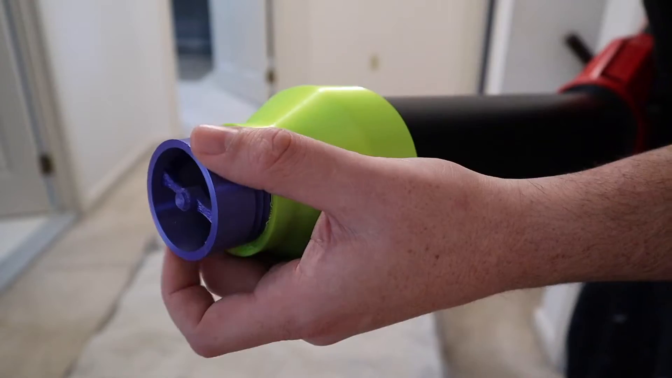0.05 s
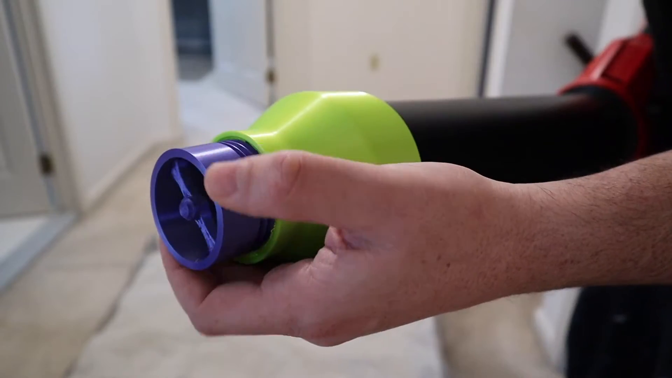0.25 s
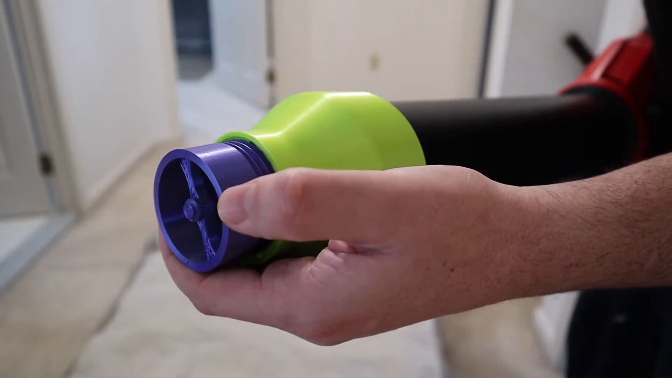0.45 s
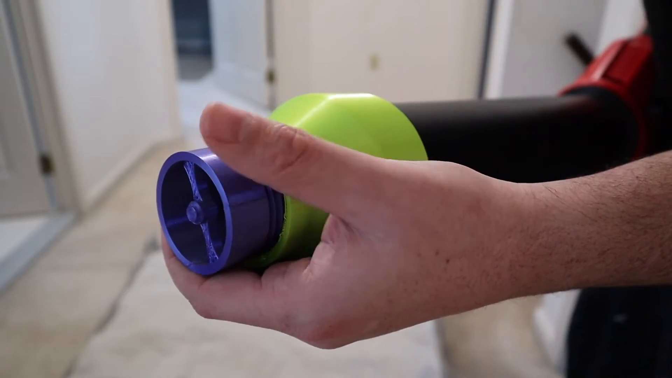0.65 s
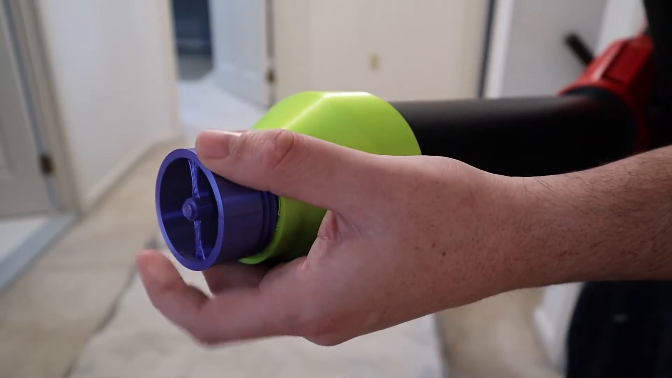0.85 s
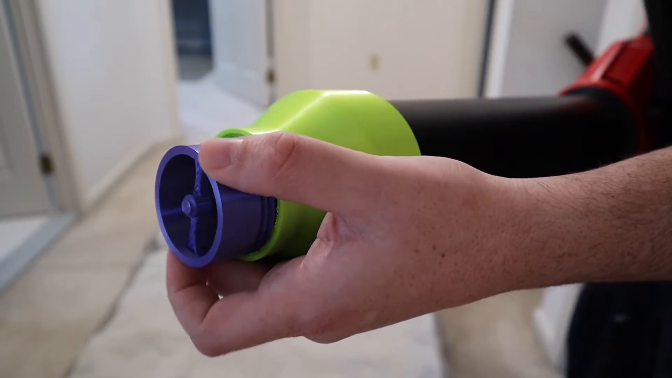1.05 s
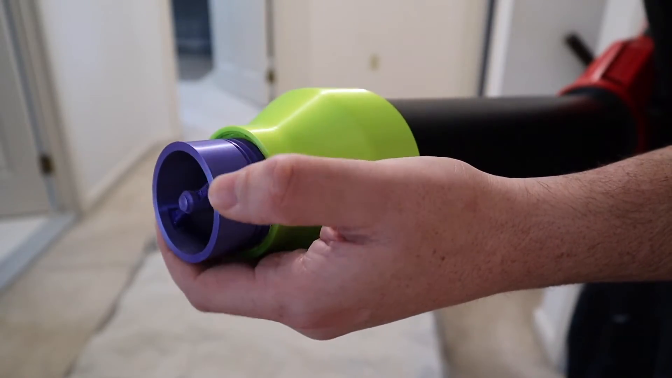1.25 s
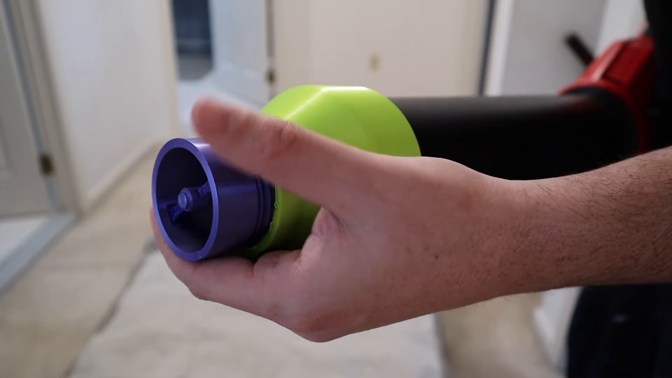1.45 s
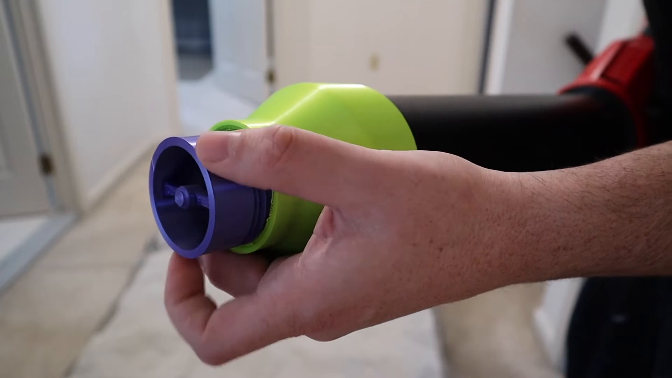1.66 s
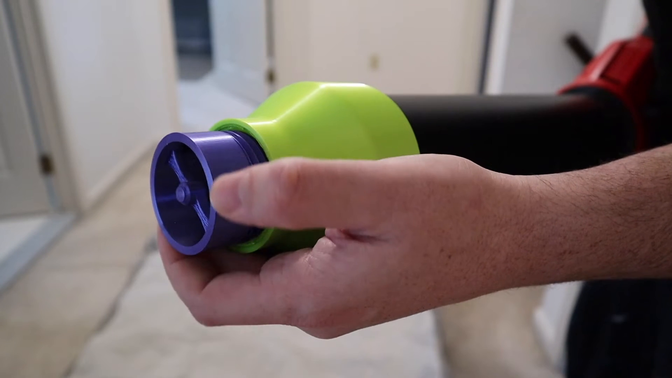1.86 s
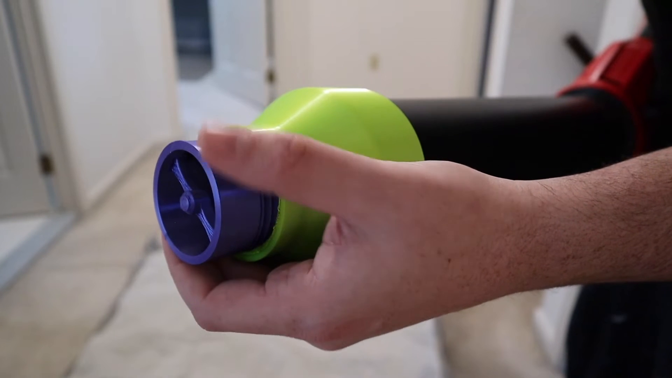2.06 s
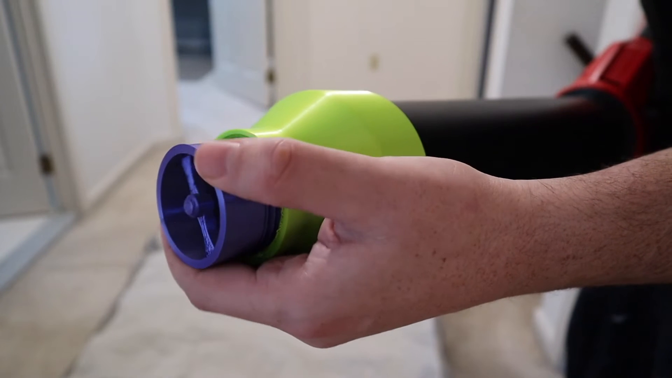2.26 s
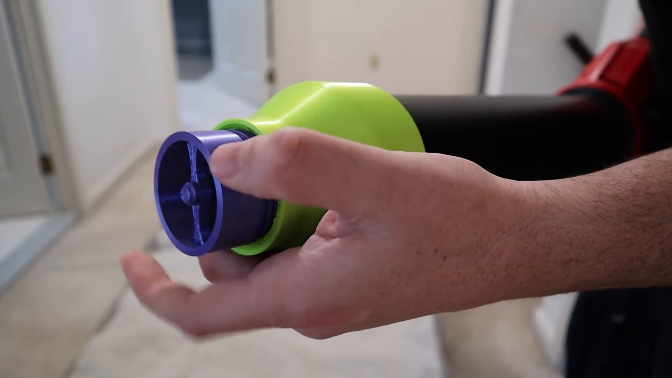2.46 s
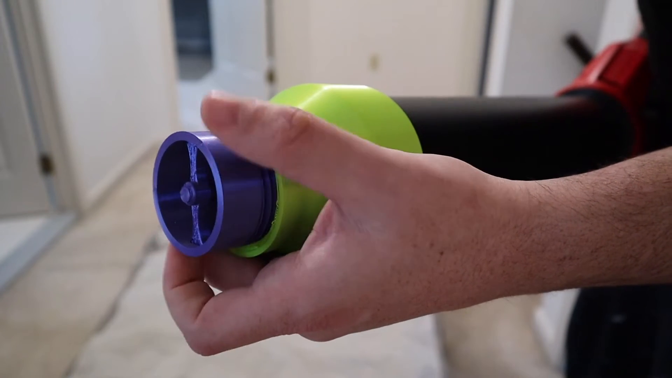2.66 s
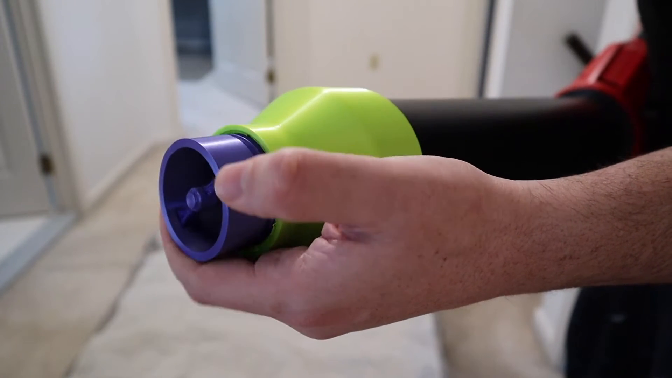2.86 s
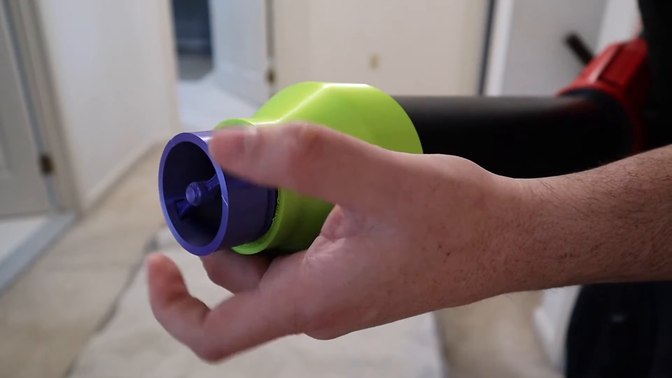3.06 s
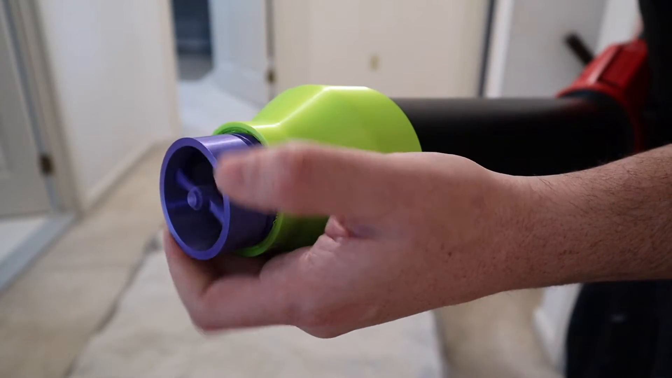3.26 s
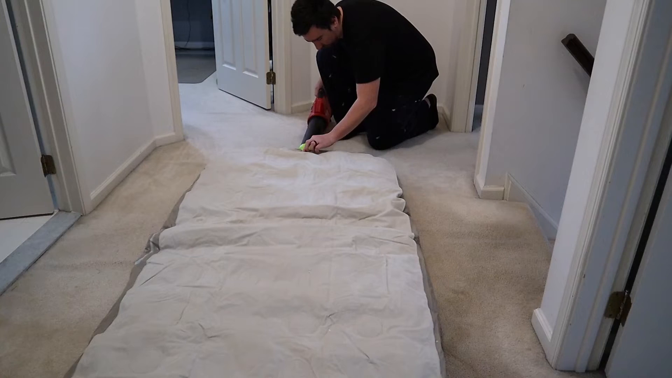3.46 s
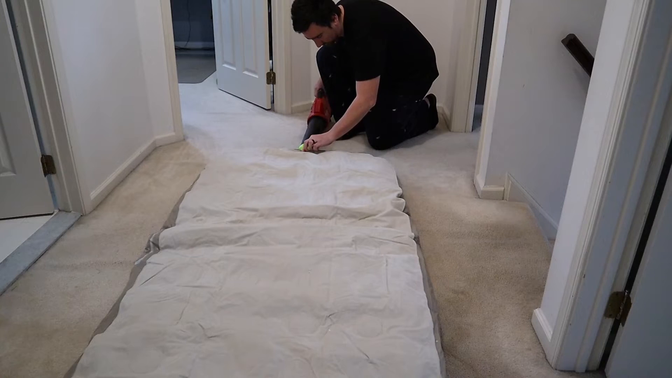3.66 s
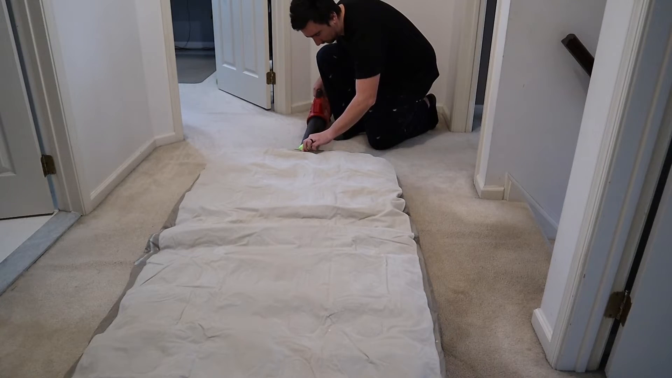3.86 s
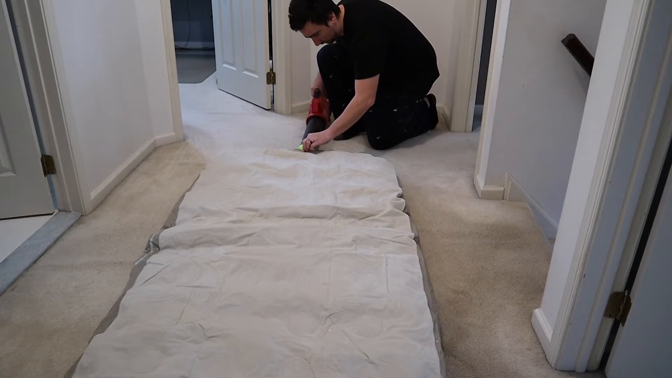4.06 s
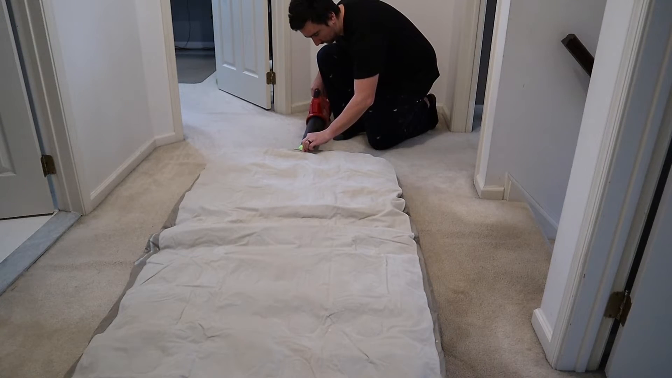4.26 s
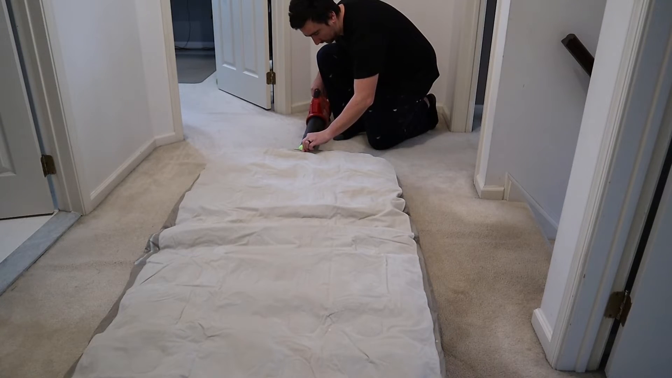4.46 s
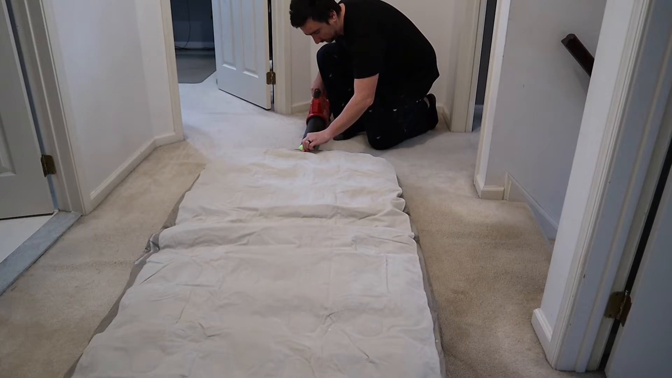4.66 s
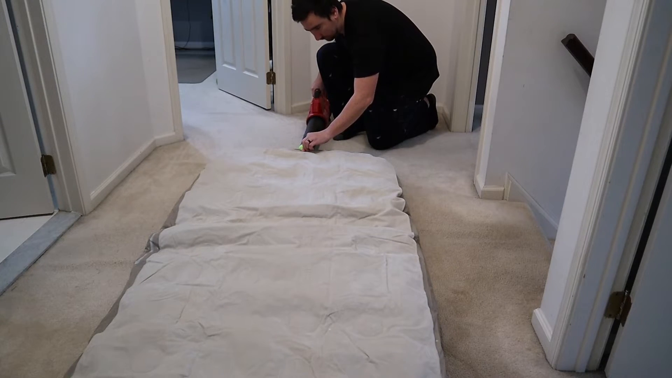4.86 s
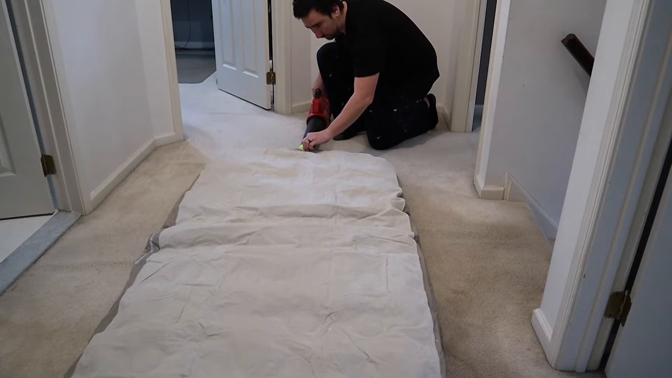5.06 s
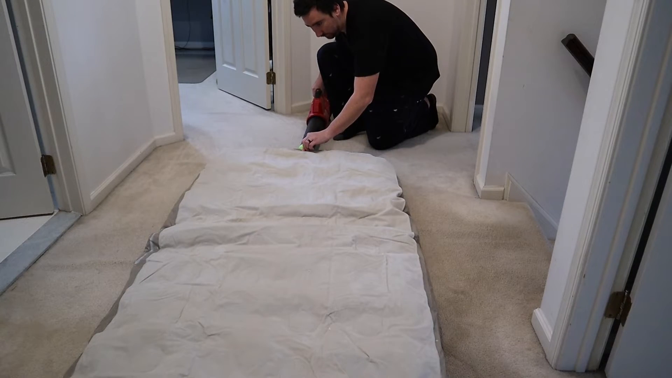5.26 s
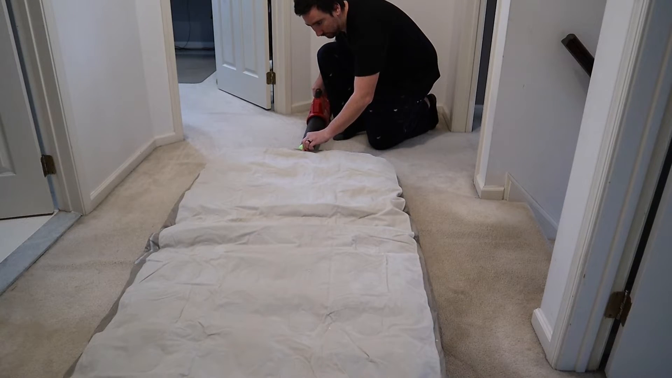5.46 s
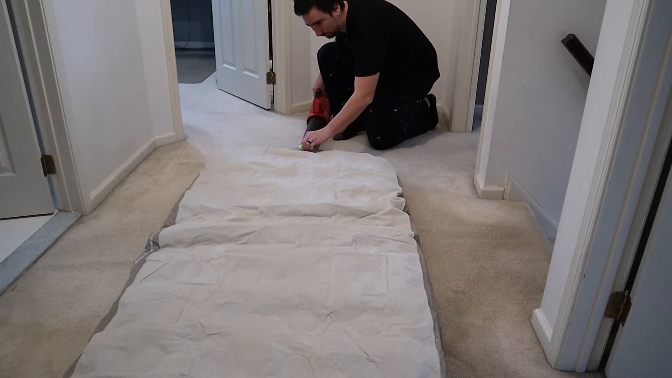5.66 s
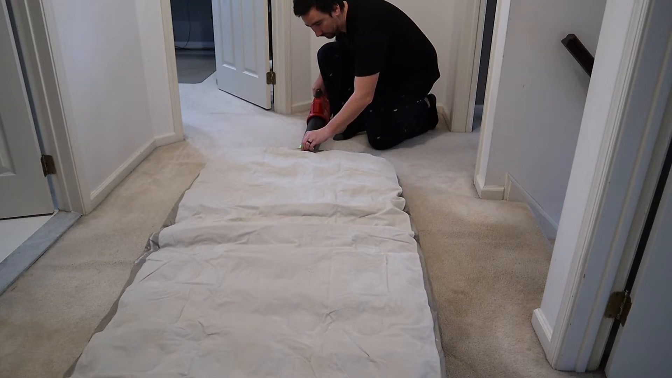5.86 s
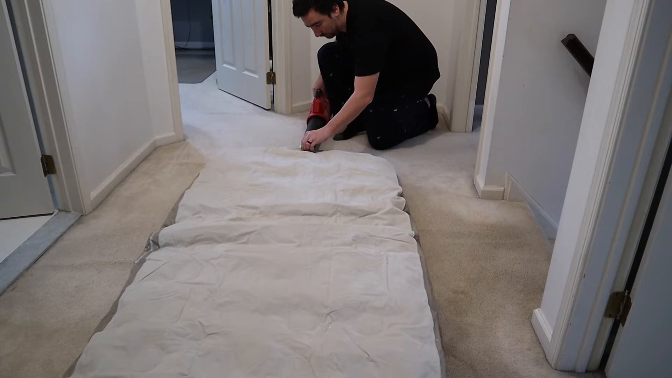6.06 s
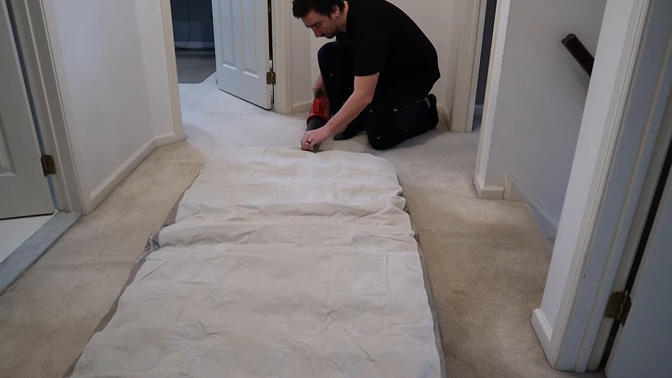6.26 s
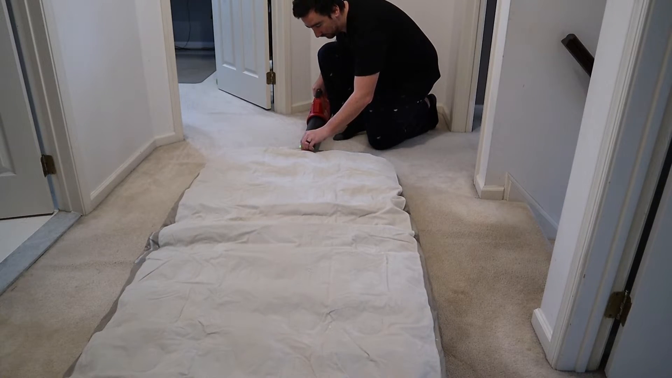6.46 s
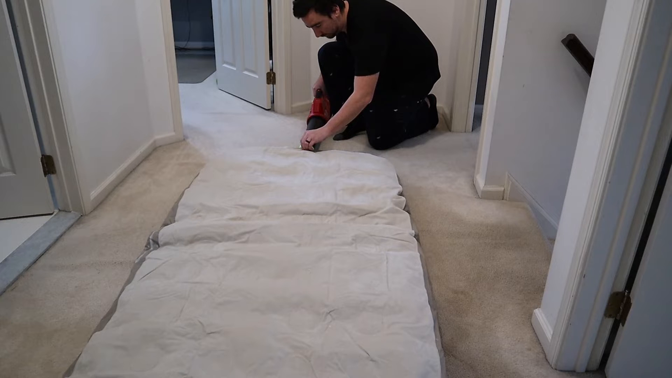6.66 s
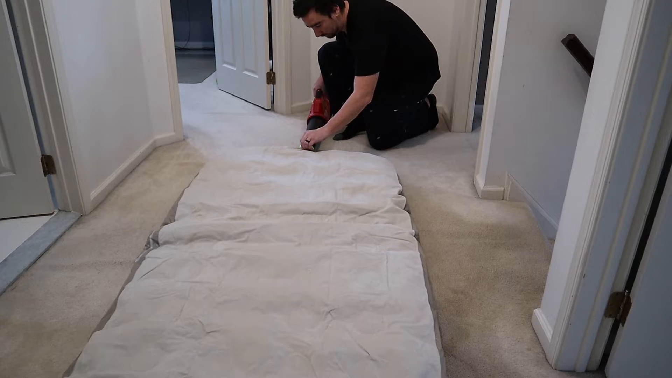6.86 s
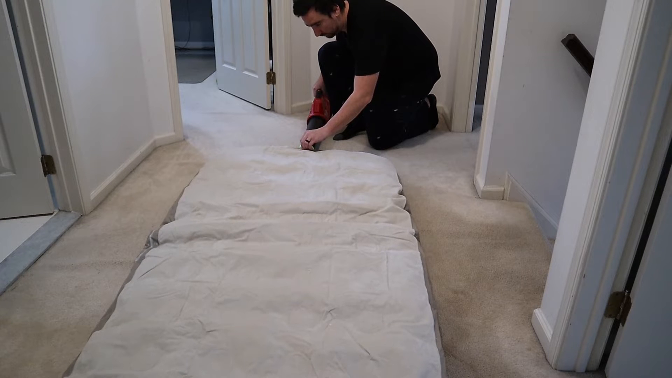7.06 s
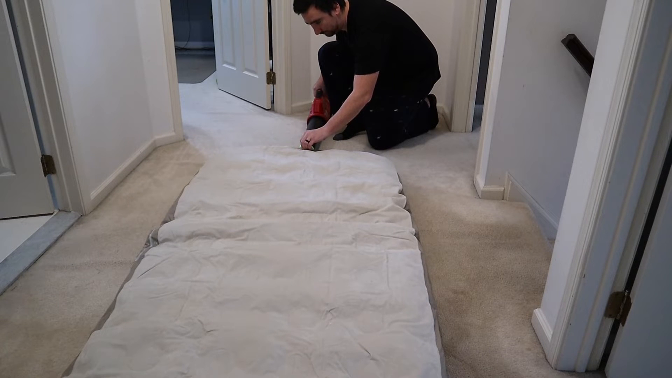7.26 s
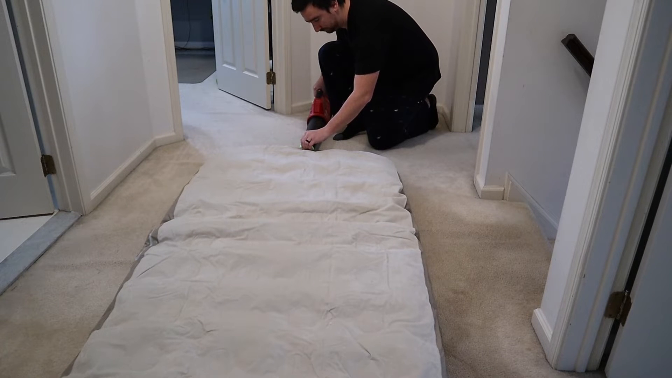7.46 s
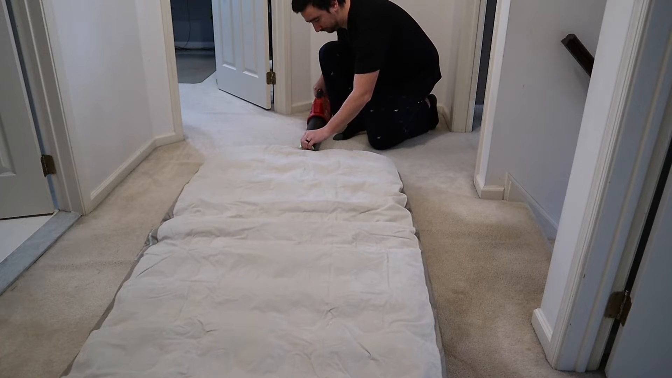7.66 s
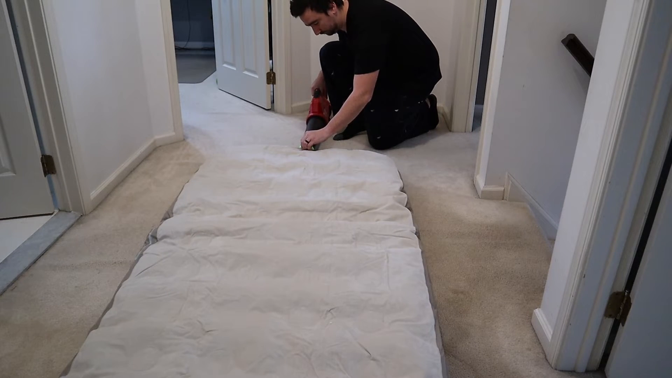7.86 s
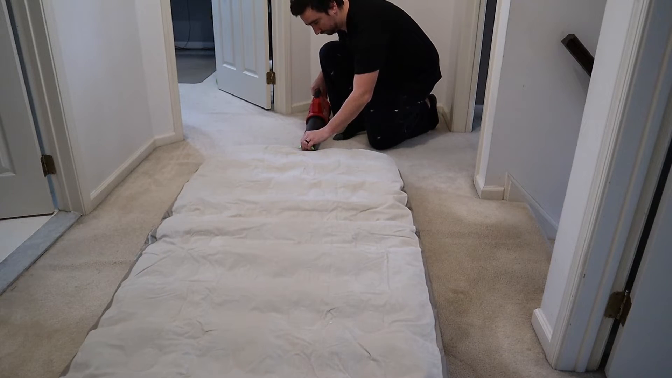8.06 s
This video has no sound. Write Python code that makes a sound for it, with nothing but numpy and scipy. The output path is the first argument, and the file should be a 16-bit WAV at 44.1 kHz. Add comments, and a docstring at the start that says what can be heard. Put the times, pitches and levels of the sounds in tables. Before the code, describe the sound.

For the first 3.4 seconds, a plastic adapter is twisted into a leaf blower's nozzle, close by in a carpeted hallway with little echo. Quiet, grainy rubbing swells and fades with each twist, while dry clicks come in uneven clusters as the thread catches and slips, busiest between 2.2 and 3.3 seconds. Soft hollow bumps sound on the tube. A short pause holds only faint room tone. At about 4.1 seconds the blower starts with a brief buzz and a fast rising whine, reaching full speed within half a second. Much louder than the handling, it pushes air into an air mattress: a hollow, resonant rush with a high, slightly wavering whistle on top. The first gust eases a little and holds steady. At about 6.6 seconds the sound abruptly jumps much higher and thinner, sped up, and continues until the end at around 8 seconds.

```python
"""Plastic rubs and clicks close by, in a carpeted hallway: a valve adapter is twisted into the nozzle
of a leaf blower, catching and slipping, while the hand bumps the hollow tube. Then the blower spins up
and forces air down the tube into an air mattress: a rush full of tube resonances with a twelve-blade
whistle on top. The last stretch plays three times too fast, as a time lapse."""
import sys
import numpy as np
from scipy import signal
from scipy.fft import rfft, irfft, next_fast_len
from scipy.io import wavfile
from scipy.ndimage import uniform_filter1d

SR = 44100
rng = np.random.default_rng(int(sys.argv[2]) if len(sys.argv) > 2 else 0)


def inscribe(sig):
    """Save sig as 16-bit PCM at rate SR to the path in sys.argv[1].

    A 1-D sig is mono; a 2-D sig holds one channel per row.
    Samples are clipped to [-1, 1] before scaling.
    """
    pcm = np.round(np.clip(np.atleast_2d(sig).T, -1, 1) * 32767)
    wavfile.write(sys.argv[1], SR, pcm.astype(np.int16))


N = 357651


def undb(db):
    """Decibels to gain."""
    return 10 ** (np.asarray(db) / 20)


def unit(x):
    """Scale to rms 1."""
    return x / np.sqrt(np.mean(x ** 2))


def bell(x, centre, width):
    """A smooth hump of height 1; width spans two standard deviations."""
    return np.exp(-.5 * (2 * (x - centre) / width) ** 2)


def curve_db(rows, hz):
    """Read an EQ curve at the given frequencies."""
    f, db = np.transpose(rows)
    return np.interp(np.log(hz + 1), np.log(f), db)


def colour(x, db_at):
    """EQ by a function from Hz to dB, then scale to rms 1."""
    size = next_fast_len(len(x))
    gain = undb(db_at(np.arange(size // 2 + 1) * SR / size))
    return unit(irfft(rfft(x, size) * gain, size)[:len(x)])


def tilt(x, db_per_octave):
    """Brighten or dull between 600 and 7500 Hz; rms 1."""
    return colour(x, lambda hz: db_per_octave * np.log2(np.clip(hz, 600, 7500) / 2600))


def wander(rate_hz, size):
    """Smooth random modulation with a spread near 1."""
    hold = int(SR / rate_hz)
    steps = np.repeat(rng.standard_normal(size // hold + 1), hold)
    return 1.21 * uniform_filter1d(steps, hold)[:size]


# EQ of the room tone: (frequency [Hz], level [dB])
ROOM_TONE_EQ = [(15, -36), (25, -16), (116, -10), (246, -14), (433, -17), (509, -14), (552, -16),
                (970, -19), (1410, -20.5), (1710, -23), (15500, -31)]

def room_tone(t, level_db=-63):
    """Low rumble of the house under a faint even hiss."""
    return undb(level_db) * colour(rng.standard_normal(len(t)), lambda hz: curve_db(ROOM_TONE_EQ, hz))


# reverb bands of the hallway: (centre [Hz], t60 [s], level [dB])
REVERB_BANDS = [(174, 0.65, -5.5), (400, 0.19, -0.5), (915, 0.27, -3.5), (2390, .22, -13),
                (7460, 0.18, -15), (15000, .13, -27)]

def hallway(x, build_s=0.0033):
    """Add diffuse reflections; carpet and walls swallow the treble first."""
    t = np.arange(SR // 2) / SR
    centres, tail = np.log([row[0] for row in REVERB_BANDS]), 0
    log_hz = np.log(1 + np.arange(len(t) // 2 + 1) * SR / len(t))
    for (hz, t60, db), share in zip(REVERB_BANDS, np.eye(len(REVERB_BANDS))):
        envelope = np.exp(-np.log(1000) * t / t60) * (1 - np.exp(-t / build_s))
        decay = unit(rng.standard_normal(len(t)) * envelope)
        crossover = np.sqrt(np.interp(log_hz, centres, share))
        tail = tail + undb(db) * irfft(rfft(decay) * crossover, len(t))
    return x + signal.fftconvolve(x, tail / np.sqrt(len(t)))[:N]


# twists of the hand: (time of firmest grip [s], level [dB], swell [s], fade [s])
TWISTS = [(0.0, -58, .05, 0.076), (.26, -53.5, 0.075, .07), (.81, -48, .016, .05),
          (1.14, -46.5, 0.078, 0.057), (1.62, -45, 0.041, 0.048), (1.825, -43.5, 0.048, 0.028),
          (2.27, -45.5, 0.04, 0.036), (2.44, -46.5, 0.073, 0.038), (2.8, -48, 0.13, .135),
          (3.256, -38, 0.029, .045)]

def grip():
    """Envelope of the rubbing: every twist swells and fades."""
    t = np.arange(N) / SR
    return np.max([undb(db) * np.exp(-np.maximum((s - t) / swell, (t - s) / fade))
                   for s, db, swell, fade in TWISTS], axis=0)


# EQ of the friction: (frequency [Hz], level [dB])
RUB_EQ = [(100, -32), (350, 7.5), (900, 3.5), (2000, -4.5), (4500, -8.5), (6500, -20), (8200, -9.5),
          (10500, -25), (13000, -15), (16000, -34)]

def rubbing(grain_db=4.0):
    """Dense tiny slips of skin and thread make a grainy scrape."""
    grains = rng.standard_normal(N) * undb(grain_db * wander(350, N))
    return colour(grains, lambda hz: curve_db(RUB_EQ, hz)) * grip()


# modes of the hollow adapter and nozzle: (frequency [Hz], level [dB], t60 [s])
NOZZLE_MODES = [(178.4, -18.5, 0.27), (289, -11.5, 0.054), (384, -8.5, 0.056), (446, -6.5, 0.043),
                (570, -4, 0.025), (732, -3, 0.036), (910, -1, 0.029), (1080, -0.5, 0.012), (1450, 2, 0.013),
                (1870, 2, 0.011), (2304, 2, 0.025), (2570, 1.5, 0.0074), (3840, 3, 0.0064),
                (4530, 1, 0.0043), (7550, 1, 0.0043), (8140, 0.5, 0.0069), (13600, -21, 0.012)]

def nozzle(push, ring_hz, crack_db=-6, ring_db=-11, favour_db=7, favour_octaves=0.18):
    """A dry crack plus a short plastic ring; the point of contact favours modes near ring_hz."""
    t = np.arange(SR // 4) / SR
    hz, db, t60 = np.transpose(NOZZLE_MODES)[:, :, None]
    db = db + favour_db * np.exp(-.5 * (np.log2(hz / ring_hz) / favour_octaves) ** 2)
    hz = hz * (1 + .015 * rng.standard_normal(hz.shape))  # the grip detunes the modes
    modes = np.sin(2 * np.pi * hz * t) * np.exp(-np.log(1000) * t / t60)
    modes = modes / np.sqrt(np.sum(modes ** 2, axis=1, keepdims=True))
    polarity = (-1) ** np.arange(len(NOZZLE_MODES))
    response = polarity @ (undb(ring_db + db) * modes)
    response[0] += undb(crack_db)
    return signal.fftconvolve(push, response)


def thread_ticks(firm_grip_db=-49, top_per_s=60, level_db=-32, spread_db=4):
    """Faint bright catches of the thread, more frequent the firmer the grip."""
    per_s = top_per_s * np.clip(grip() / undb(firm_grip_db), 0, 1)
    pushes = (rng.random(N) < per_s / SR) * undb(level_db + spread_db * rng.standard_normal(N))
    bright = tilt(pushes, db_per_octave=4) * np.std(pushes)
    return nozzle(bright, ring_hz=7400)[:N]


# the hand bumps the blower's long tube: (time [s], level [dB], lift of the upper modes [dB])
BUMPS = [(.335, -56, -2), (.803, -47.5, 12.5), (1.619, -54, 0), (2.23, -49, 3), (2.372, -48, -4),
         (2.666, -50, 2), (2.738, -56, 6), (2.822, -52, 9), (3.189, -50, 0), (3.291, -49, -2)]
# modes of the air in that tube: (frequency [Hz], level [dB], t60 [s])
TUBE_MODES = [(179, -1, 0.37), (285, -2.5, 0.14), (352, 1.5, .14)]

def tube_bumps(attack_s=.004):
    """Soft pushes set the air in the tube ringing hollowly; harder ones stir its upper modes."""
    out, t = np.zeros(N), np.arange(SR // 2) / SR
    for s, db, lift_db in BUMPS:
        ring = 0
        for k, (hz, mode_db, t60) in enumerate(TUBE_MODES):
            mode = np.sin(2 * np.pi * hz * t) * np.exp(-np.log(1000) * t / t60)
            ring = ring + undb(mode_db + lift_db * (k > 0)) * mode
        start = int(s * SR)
        out[start:start + len(t)] += undb(db) * ring * (1 - np.exp(-t / attack_s))
    return out


# the adapter catches and slips in the nozzle:
# (time [s], relative level [dB], hardness [dB/octave], slip length [ms], favoured ring [Hz])
CATCHES = [(0.319, -45.5, -7, 4, 804), (0.336, -49, -5, 4.4, 686), (0.590, -65.5, -10.5, 5, 340),
           (0.761, -49.5, -6.5, 2.1, 344), (0.785, -40, -3.5, 12, 340), (0.7991, -30.5, -3, 1.9, 298),
           (0.811, -36.5, -2.5, 2, 300), (1.034, -52, 0, 3.3, 400), (1.094, -47.5, 0, 6, 450),
           (1.132, -45, -1.5, 3.2, 786), (1.253, -56, 4, 0.93, 520), (1.542, -40.5, -5, 1.26, 1810),
           (1.567, -46.5, -8, 2.6, 1800), (1.598, -35, -4.5, 1.8, 1900), (1.63, -46, 1, 1.1, 450),
           (1.652, -50, 4, 0.9, 450), (1.786, -52, 7, 8.2, 2100), (1.7935, -36.5, -0.5, 1.1, 600),
           (1.8, -37.5, -5.5, 1.3, 2050), (1.846, -41, 0, 1, 910), (2.2267, -33.5, -1, 0.61, 3700),
           (2.229, -28.5, 1, 1.2, 3700), (2.255, -38, 7, 0.7, 7400), (2.349, -39, -4.5, 3.1, 2800),
           (2.37, -33, -4, 3.3, 400), (2.375, -34.5, -2, 4.1, 1100), (2.382, -35, -2, 1.7, 450),
           (2.425, -49, -4.5, 5, 690), (2.4394, -38, -5, 1.1, 794), (2.468, -44.5, -5.5, 6, 2420),
           (2.556, -46.5, -2, 0.6, 1410), (2.656, -43, -6, 6.1, 520), (2.666, -41.5, -7, 3.4, 1010),
           (2.7362, -31.5, -6, 1.7, 1080), (2.8205, -30, -3.5, 1.6, 790), (2.826, -31.5, -2.5, 2.7, 1400),
           (2.837, -25.5, -1, 1.3, 690), (2.954, -48, -5.5, 3.6, 900), (3.187, -39.5, -4, 1.8, 2420),
           (3.192, -37.5, -2.5, 1.6, 600), (3.2065, -40, -1, 0.8, 7400), (3.288, -38, -4, 1.8, 1020),
           (3.295, -38, -4.5, 4.9, 1010), (3.395, -49.5, -2.5, 3.3, 780)]

def adapter_clicks(rise=0.58, fall=0.82):
    """Each catch and slip is a chatter that swells and dies; harder contacts are brighter."""
    out, t = np.zeros(N), np.arange(2048) / SR
    lead = len(t) // 8  # room for the EQ to ring ahead of the attack
    chatters = rng.standard_normal((len(CATCHES), len(t)))
    for (s, db, hardness, slip_ms, ring_hz), chatter in zip(CATCHES, chatters):
        age = t * 1000 / max(slip_ms, .3)  # in slip lengths, like rise and fall
        burst = chatter * (1 - np.exp(-age / rise)) * np.exp(-age / fall)
        burst = tilt(np.roll(burst, lead), hardness)
        # hold the level in the presence band, whatever the hardness
        presence = np.abs(rfft(burst))[len(t) // 32:len(t) // 8]
        clack = nozzle(burst * undb(db + 24.5) / np.sqrt(np.mean(presence ** 2)), ring_hz)
        start = int(s * SR) - lead
        out[start:start + len(clack)] += clack
    return out


TRIGGER_S, FULL_SHAFT_HZ = 4.06, 239.7

def spin_up(age, pull_s=.045, settle_s=.157, settle_share=.45):
    """Share of full speed, age seconds after the trigger: a quick pull, then a slow settling."""
    age = np.maximum(age, 1 / SR)
    return 1 - settle_share * np.exp(-age / settle_s) - (1 - settle_share) * np.exp(-age / pull_s)


def motor_start(t):
    """The drive jolts, sings and buzzes briefly as it pulls the rotor from rest."""
    # noise bursts: (time [s], half length [s], centre [Hz], width [Hz], relative level [dB])
    bursts = [(4.084, 0.014, 9000, 12000, -45), (4.078, 0.03, 7900, 70, -39),
              (4.105, 0.016, 7400, 100, -39), (4.115, 0.022, 1265, 25, -22),
              (4.125, 0.062, 2890, 500, -24.5), (4.168, 0.034, 605, 130, -25)]
    out = 0
    for s, half_s, hz, width, db in bursts:
        band = colour(rng.standard_normal(SR), lambda f: -10 * np.log10(1 + (2 * (f - hz) / width) ** 4))
        out = out + undb(db - 3.5) * np.exp(-((t - s) / half_s) ** 2) * np.resize(band, len(t))
    return out


# the load changes and the shaft speed shifts: (time before speed-up [s], half length [s], shift [Hz])
SURGES = [(4.832, 0.21, 0.87), (4.986, 0.053, 1.23), (5.33, .08, 0.62), (5.676, 0.08, 0.91),
          (5.788, 0.068, 1.45), (6.121, 0.076, 1), (6.291, 0.092, 1.16), (6.612, 0.0737, 1.21),
          (6.81, 0.062, 0.78), (7.081, .26, 0.87), (7.999, 0.202, -.5)]
# blade whistle and whine:
# (pitch [x shaft rate], base level [dB], swell [dB per Hz of surge], raggedness [factor])
BLADE_TONES = [(12, -30.5, 5.5, 0.67), (16, -42, -2, 1.8)]
# housing resonances that make those tones flare and dip as they sweep through:
# (tone [x shaft rate], centre [Hz], width [Hz], gain [dB])
HOUSING_EQ = [(12, 2440, 100, 11.5), (12, 2680, 245, -6), (12, 2850, 52, 1.5), (16, 2920, 710, 22.5),
              (16, 3717, 50, 8)]
# weaker hum of the rotor: (pitch [x shaft rate], level [dB])
ROTOR_TONES = [(1, -42.5), (3, -41), (9, -54), (14, -50)]

def impeller(t, speed, waver=0.00058, flicker_db=0.5, ragged_db=5, db_per_doubling=13):
    """Blade whistle and whine, ragged until the flow is up to speed, over the rotor's hum."""
    surge_hz = sum(shift * np.exp(-((t - s) / half_s) ** 2) for s, half_s, shift in SURGES)
    shaft_hz = FULL_SHAFT_HZ * speed + surge_hz
    angle = 2 * np.pi * np.cumsum(shaft_hz * (1 + waver * wander(40, len(t)))) / SR
    out = 0
    for order, base_db, swell, ragged in BLADE_TONES:
        unsettled = ragged * np.sqrt(np.maximum(1 - speed, 0))
        housing_db = sum(db * bell(order * shaft_hz, hz, width)
                         for tone, hz, width, db in HOUSING_EQ if tone == order)
        db = base_db + db_per_doubling * np.log2(speed) + swell * surge_hz + housing_db
        db = db + flicker_db * wander(22, len(t)) + ragged_db * unsettled * wander(200, len(t))
        out = out + undb(db) * np.sin(order * angle + unsettled * wander(250, len(t)))
    fade_in = (np.clip(shaft_hz / 165 - .3, 0, .7) / 0.71) ** 2
    for order, db in ROTOR_TONES:
        out = out + np.sin(order * angle) * undb(db + 1.8 * wander(6.6, len(t))) * fade_in
    return np.sqrt(2) * out


# broad EQ of the turbulence: (frequency [Hz], relative level [dB])
AIR_EQ = [(45, -137), (72, -102), (95, -69), (200, -68), (550, -52.5), (1000, -59.5), (1900, -59.5),
          (3200, -61), (4200, -66), (6500, -68.5), (9000, -72), (10200, -78.5), (13000, -79.5),
          (15600, -89)]
# resonances and notches of tube and hallway: (centre [Hz], width [Hz], gain [dB])
TUBE_EQ = [(112,22,2.5), (133,6.1,-15.5), (149.6,33,6.5), (221.7,8.5,8), (321,8.2,-13.5), (335,6.7,5),
           (416.2,29.6,13), (442.8,75,-12.5), (497,6.7,-8), (532,19,-9.5), (600,19.2,-14), (695,44,-6),
           (765.7,16,7.5), (887,174,-11.5), (935.4,48,14), (1097,19,5), (1160,10.7,11), (1250,210,-3),
           (1409,25,6), (1548,11,7.5), (1660,7.3,7.5), (1747,24,-9), (1772,35,5), (1896,37,3),
           (2116,15,9.5), (2350,82,-2.5), (2715,220,-4.5), (2950,18,-10), (3360,39,-5)]
FLOW_DB, FLOW_DB_PER_DOUBLING, FIRST_GUST_DB, BACK_PRESSURE_S = -25, 9, 8, 0.55

def air_rush(t, speed, flutter_db=-0.1, bass_lag_db=14, treble_lag_db=22, ripple_db=2.0):
    """Turbulence in the tube; its bass and treble fill in only as the impeller gains speed."""
    def tube_db(hz):
        # the crowded upper resonances make a fine uneven ripple
        ripple = np.interp(hz, np.linspace(0, SR / 2, 500), rng.standard_normal(500))
        ripple *= np.clip(hz / 1500 - 1, 0, 1)
        resonances = sum(db * bell(hz, centre, width) for centre, width, db in TUBE_EQ)
        return curve_db(AIR_EQ, hz) + ripple_db * ripple + resonances
    air = colour(rng.standard_normal(len(t)), tube_db)
    bass = signal.sosfiltfilt(signal.butter(2, 800, "low", fs=SR, output="sos"), air)
    treble = signal.sosfiltfilt(signal.butter(2, 4000, "high", fs=SR, output="sos"), air)
    bands = ((bass, bass_lag_db), (air - bass - treble, 0), (treble, treble_lag_db))
    slowness = np.clip(1.5 - speed / .5, 0, 2)
    flow = sum(band * undb(flutter_db * wander(18, len(t)) - lag * slowness) for band, lag in bands)
    # the first gust eases as the mattress pushes back
    gust = np.exp(-np.maximum(t - TRIGGER_S, 0) / BACK_PRESSURE_S)
    return flow * undb(FLOW_DB + FLOW_DB_PER_DOUBLING * np.log2(speed) + FIRST_GUST_DB * gust)


def blower(t, attack_s=0.025):
    """Air, impeller and motor, from the moment the trigger is pulled."""
    age = t - TRIGGER_S
    speed = spin_up(age)
    fade_in = np.clip(age / attack_s, 0, 1) ** 2
    return (air_rush(t, speed) + impeller(t, speed) + motor_start(t)) * fade_in


def scene(lapse_s=6.638, lapse_speed=3, lapse_db=-.5):
    """Handling, then blowing, the same in both channels; the end is sped up and so pitched up."""
    cut = int(lapse_s * SR)
    t = np.arange(cut + (N - cut) * lapse_speed) / SR  # extra length to feed the time lapse
    bed = blower(t) + room_tone(t)
    lapse = undb(lapse_db) * signal.resample_poly(bed[cut:], 1, lapse_speed)
    handling = hallway(adapter_clicks() + tube_bumps() + rubbing())
    mono = handling + np.concatenate([bed[:cut], lapse])
    return np.array([mono, mono])


def record(dry, top_hz=16000):
    """A steep low-pass takes off the very top."""
    return signal.sosfilt(signal.ellip(10, .1, 80, top_hz, fs=SR, output="sos"), dry)


dry = scene()
out = record(dry)
inscribe(out)
```